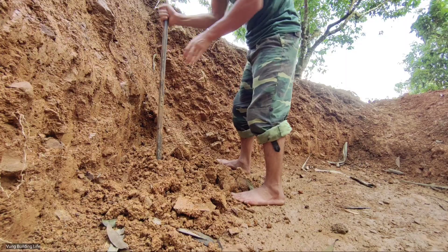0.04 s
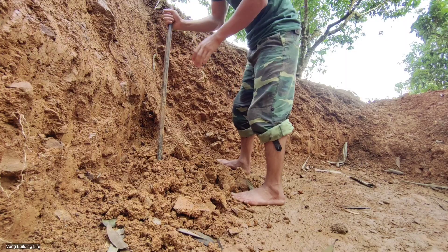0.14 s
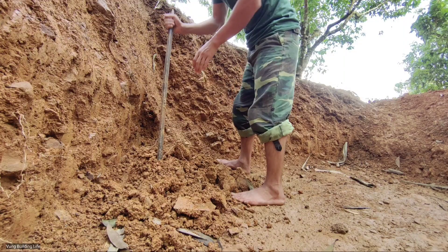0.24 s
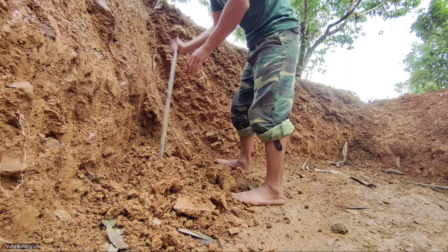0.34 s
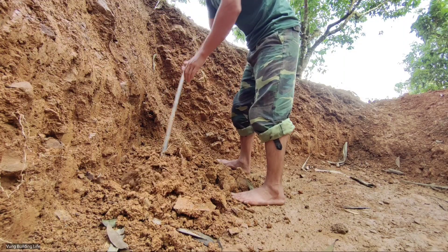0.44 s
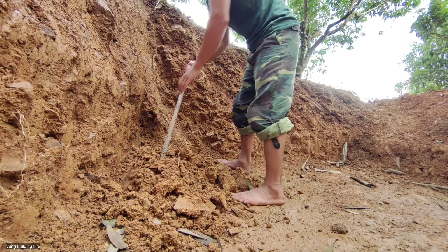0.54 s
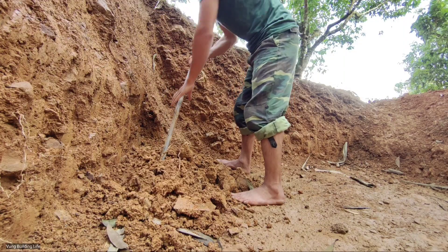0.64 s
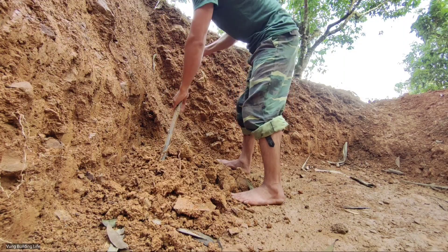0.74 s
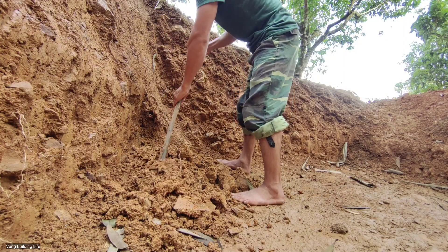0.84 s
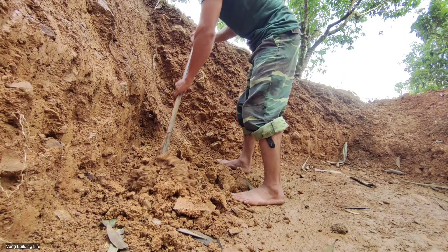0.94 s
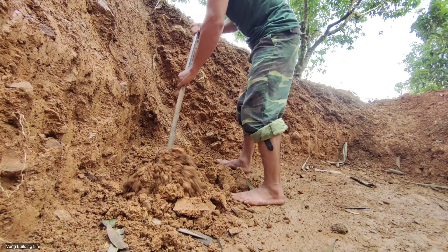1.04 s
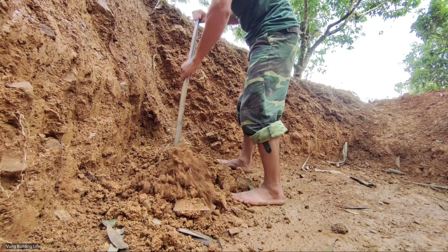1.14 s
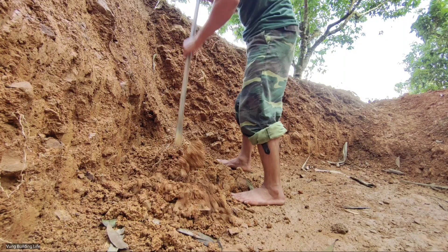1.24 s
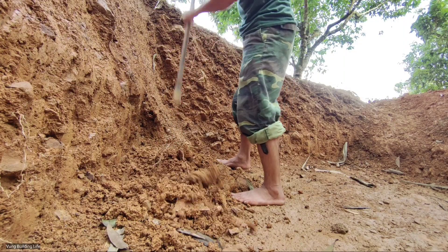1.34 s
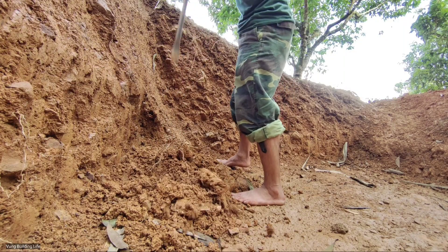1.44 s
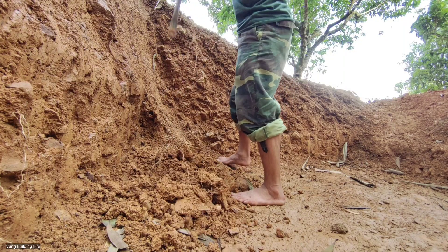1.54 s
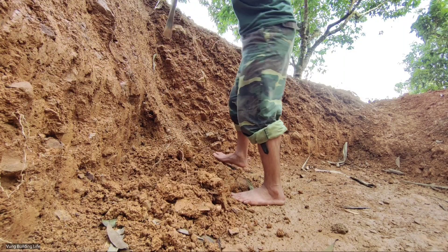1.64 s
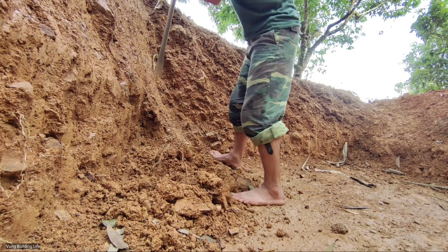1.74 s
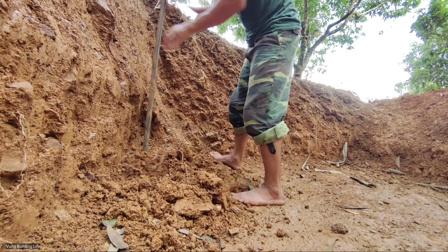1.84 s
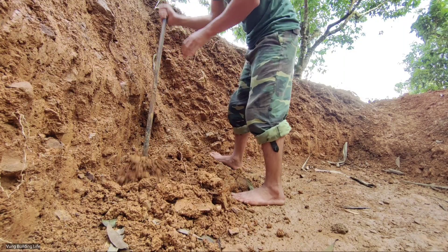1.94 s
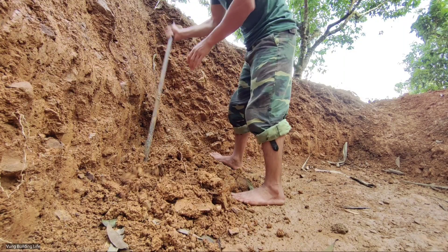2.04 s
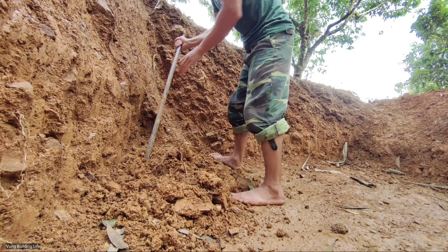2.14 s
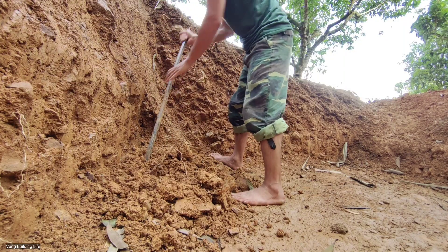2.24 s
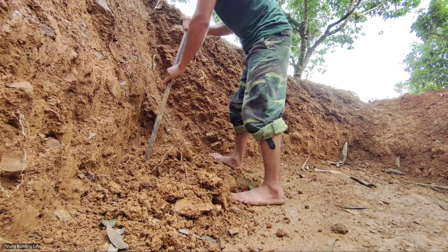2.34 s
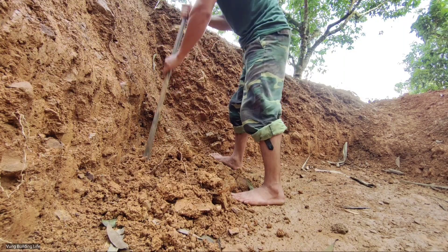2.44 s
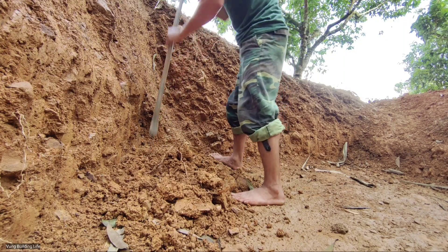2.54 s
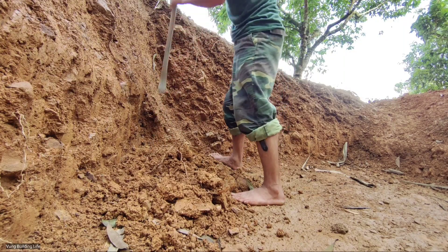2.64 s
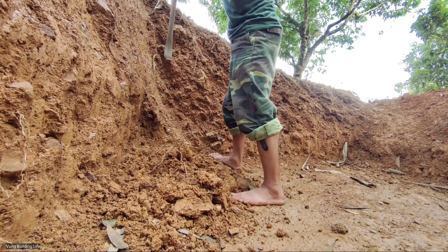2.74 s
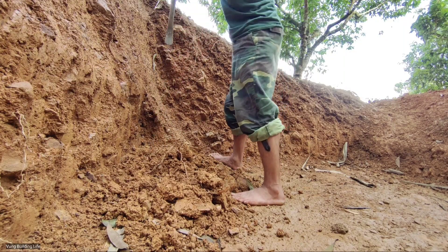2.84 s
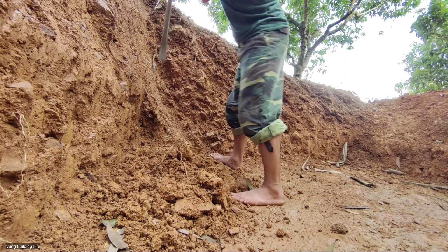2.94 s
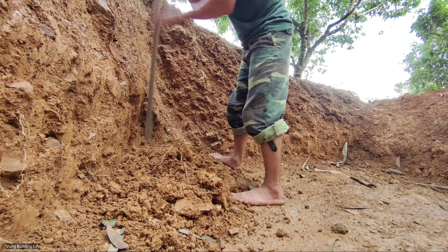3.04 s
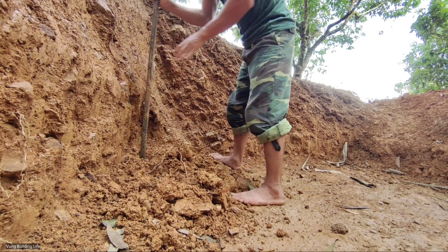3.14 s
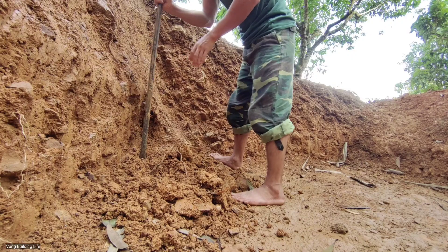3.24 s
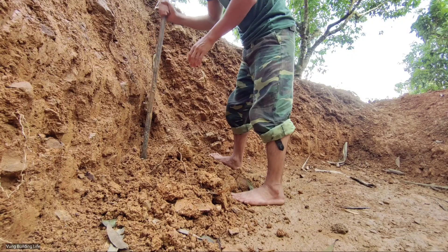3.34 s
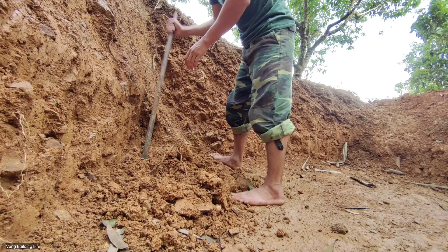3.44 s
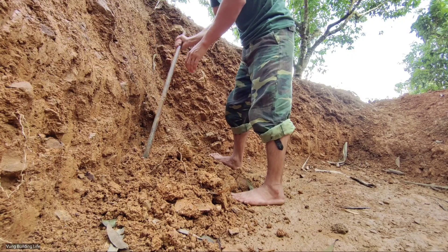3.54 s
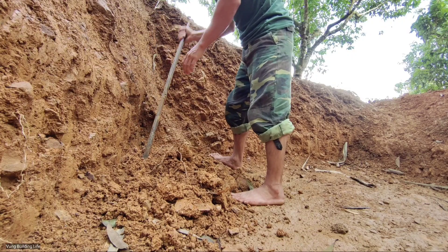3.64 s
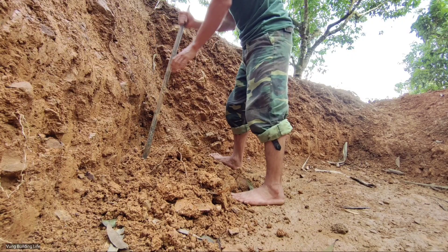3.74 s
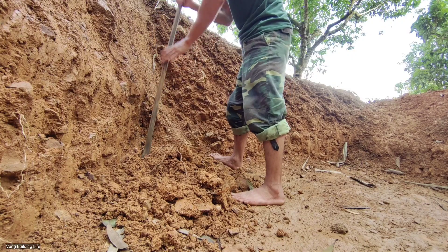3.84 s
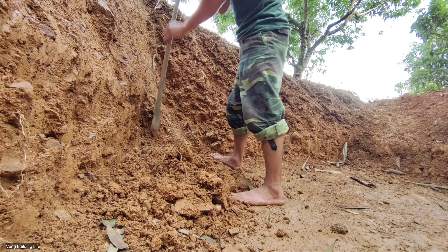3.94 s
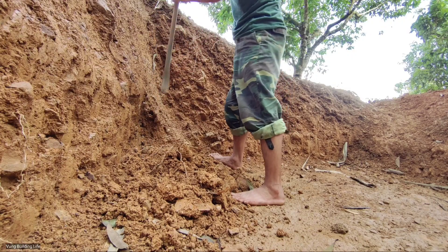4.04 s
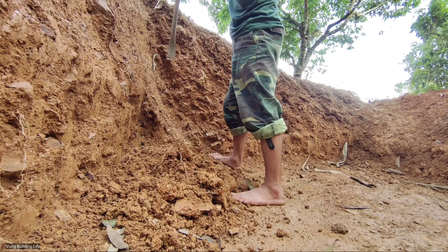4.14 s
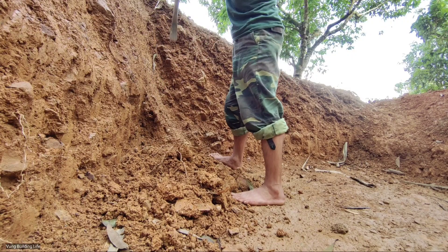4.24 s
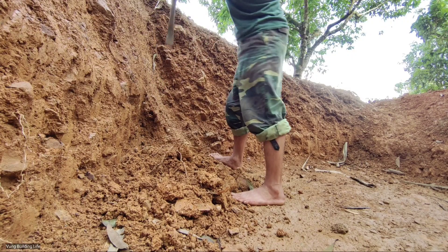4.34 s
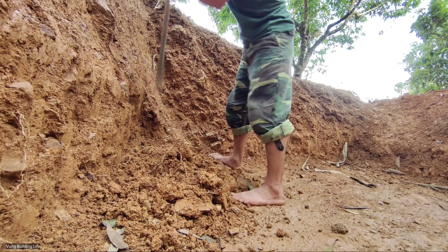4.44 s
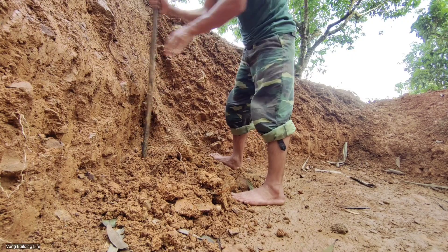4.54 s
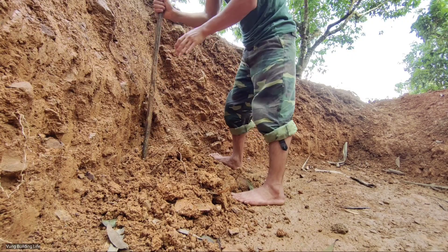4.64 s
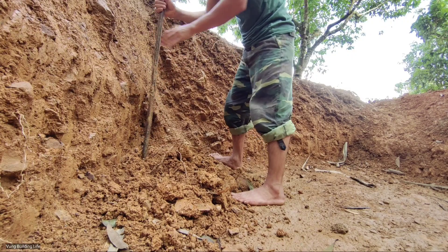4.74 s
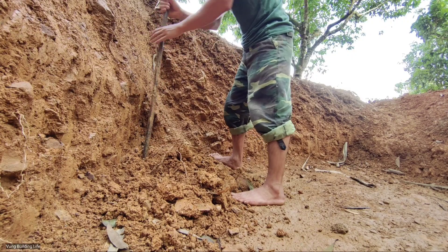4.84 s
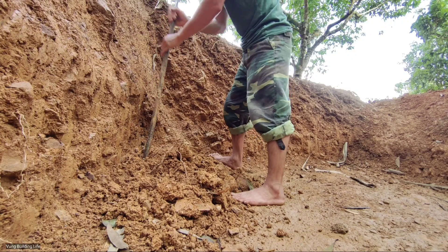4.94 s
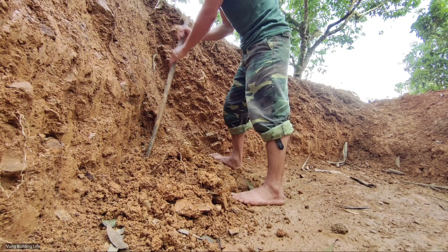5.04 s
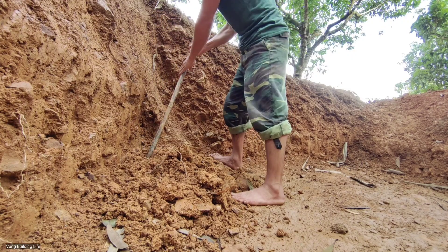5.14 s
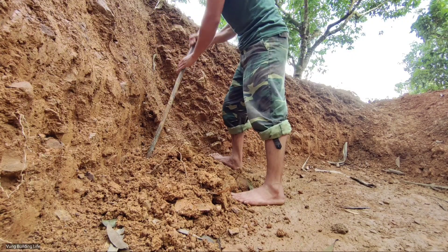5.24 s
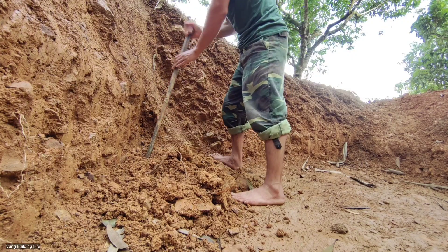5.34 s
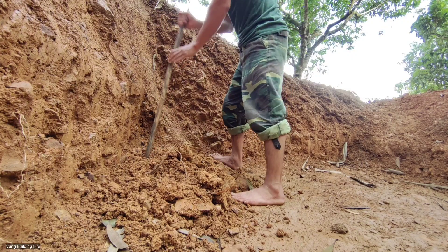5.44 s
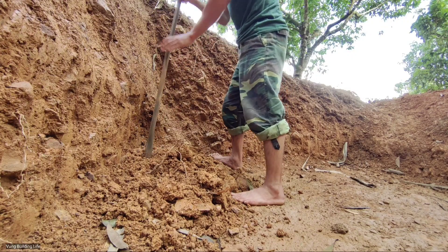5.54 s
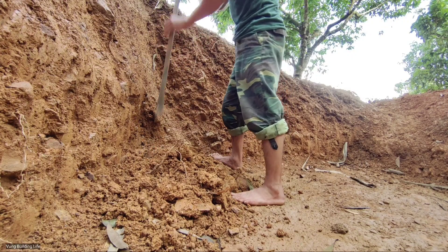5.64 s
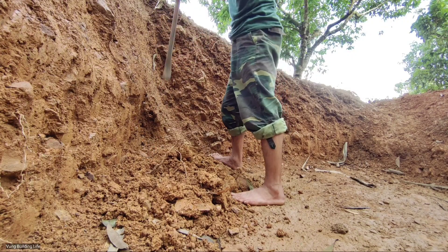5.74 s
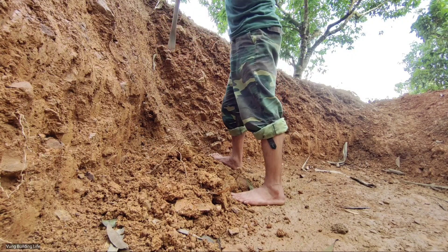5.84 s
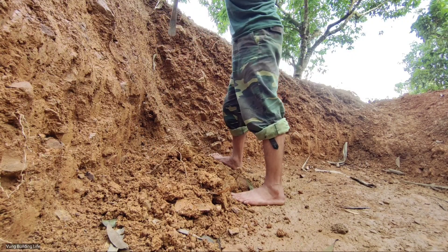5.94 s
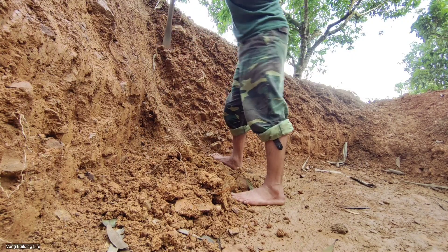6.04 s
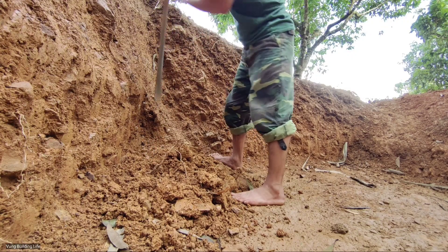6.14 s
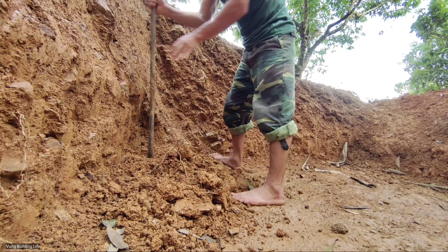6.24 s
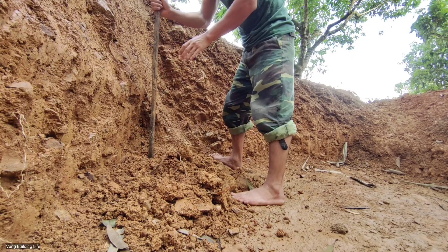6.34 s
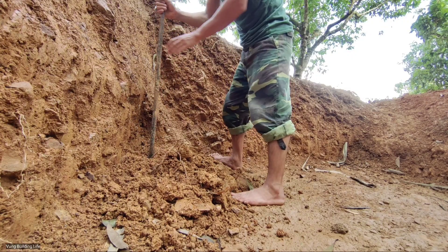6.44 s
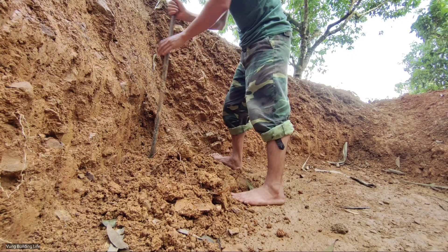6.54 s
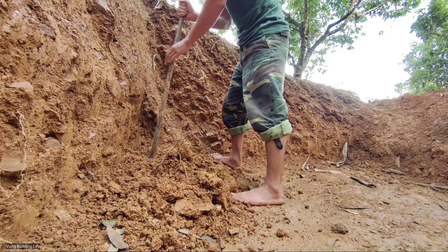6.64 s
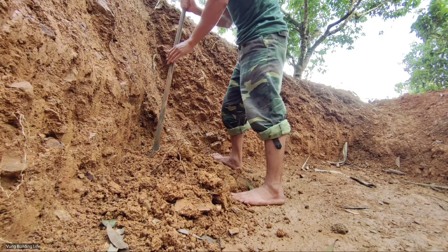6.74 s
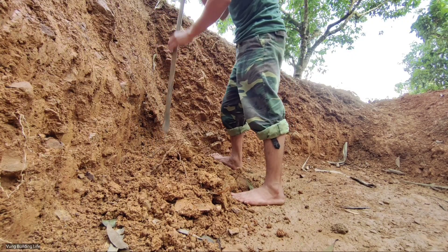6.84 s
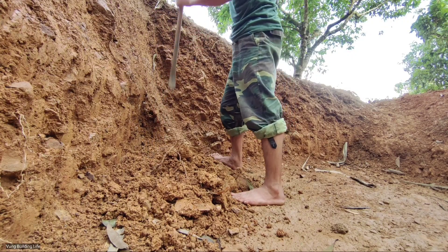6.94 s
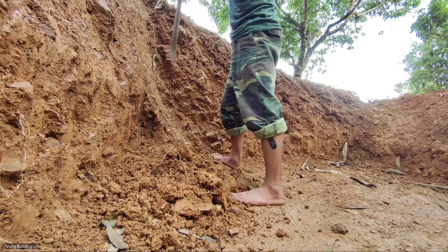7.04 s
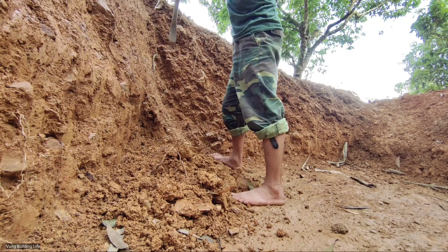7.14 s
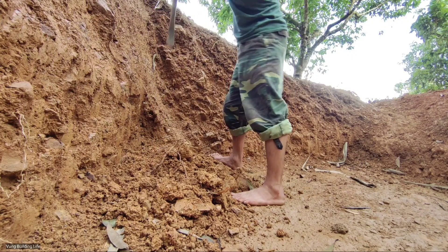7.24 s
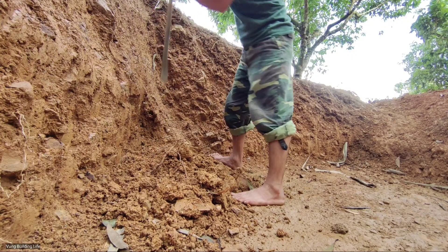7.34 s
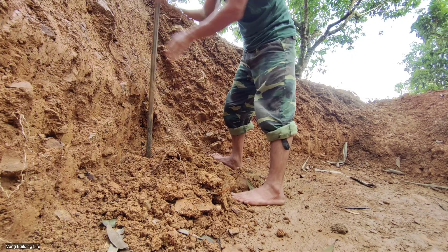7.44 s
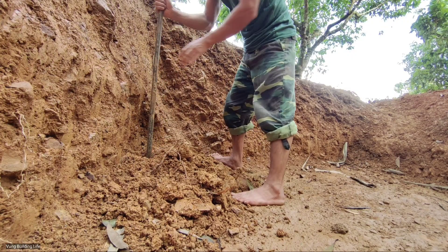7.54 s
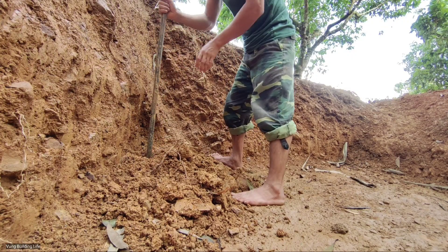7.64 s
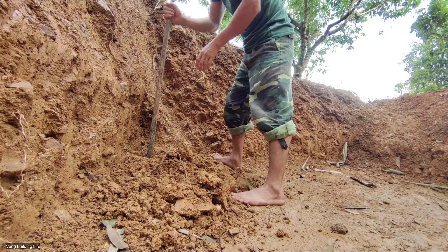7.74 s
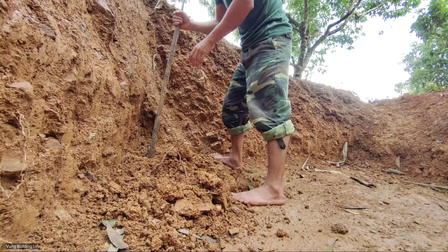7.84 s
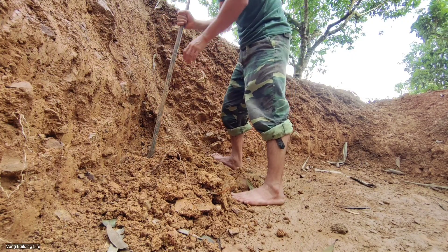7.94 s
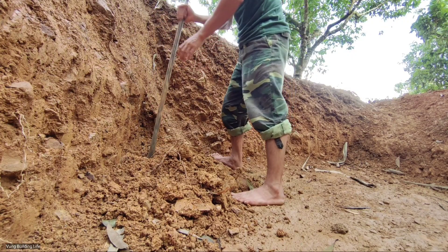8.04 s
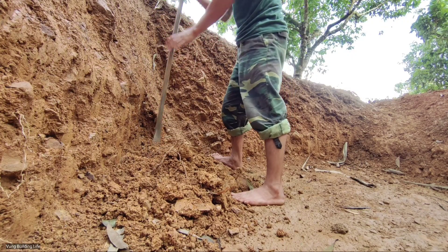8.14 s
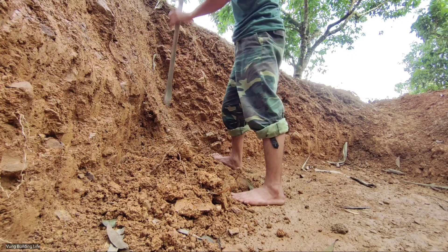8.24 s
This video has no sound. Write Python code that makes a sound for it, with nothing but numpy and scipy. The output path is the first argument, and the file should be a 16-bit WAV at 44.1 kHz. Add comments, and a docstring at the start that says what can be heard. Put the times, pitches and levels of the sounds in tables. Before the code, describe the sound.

A heavy iron bar strikes hard clay again and again with sharp cracks and dull thuds, crumbling dirt between blows, faint cicadas far off.

```python
"""An iron digging bar is driven into hard clay in a pit, levered and drawn out: noise cracks plus sine thuds.
The bar rings as it rubs (noise through bending modes); clods snap and knock, grit, sand and lumps trickle.
Cicadas hiss far off over murmuring air (shaped stereo noise).
Two spaced microphones of unlike treble listen; the clay walls add a short reverb."""
import sys
import numpy as np
from scipy import signal
from scipy.fft import rfft, irfft, next_fast_len
from scipy.io import wavfile
from scipy.ndimage import uniform_filter1d, map_coordinates

SR = 44100
rng = np.random.default_rng(int(sys.argv[2]) if len(sys.argv) > 2 else 0)


def store_wav(level_fs):
    """Save 16-bit WAV to argv[1]."""
    pcm = np.round(np.clip(np.atleast_2d(level_fs), -1, 1) * 32767)
    wavfile.write(sys.argv[1], SR, pcm.T.astype(np.int16))


N = 364707


def amp(db):
    """Decibels to gain."""
    return 10 ** (np.asarray(db) / 20)


def unit(x):
    """Scaled to rms 1."""
    return x / np.sqrt(np.mean(x ** 2) + 1e-20)


def peak(x):
    """Scaled to peak 1."""
    return x / np.abs(x).max()


def along(points, hz):
    """Interpolates (f/Hz, value) points on a log frequency axis."""
    f, v = np.transpose(points)
    return np.interp(np.log(hz + 1), np.log(f + 1), v)


def curve(rows):
    """Interpolates (t/s, value) rows to one value per sample."""
    s, value = np.transpose(rows)
    return np.interp(np.arange(N) / SR, s, value)


def wobble(knots_per_s):
    """Smooth random curve."""
    knots = rng.standard_normal(int(N * knots_per_s / SR) + 4)
    return map_coordinates(knots, [np.arange(N) * knots_per_s / SR])


def filtered(x, response):
    """Applies a complex frequency response to x."""
    n = x.shape[-1]
    m = next_fast_len(n + SR // 4)
    return irfft(rfft(x, m) * response(np.fft.rfftfreq(m, 1 / SR)), m)[..., :n]


def band(hz, lo_hz, hi_hz):
    """Causal band-pass, 12 dB an octave each side."""
    high_pass = 1j * hz / lo_hz / (1 + 1j * hz / lo_hz)
    return (high_pass / (1 + 1j * hz / hi_hz)) ** 2


def resonance(hz, centre_hz, width_hz):
    """Band-pass response of one damped mode, gain 1 at its centre."""
    damping = 1j * hz * width_hz
    return damping / (centre_hz ** 2 - hz ** 2 + damping)


def add(track, s, sound):
    """Mixes a sound into the track at s seconds."""
    part = track[..., round(s * SR):][..., :sound.shape[-1]]
    part += sound[..., :part.shape[-1]]


def burst(t, t60_s):
    """Noise with a 0.4 ms attack, 60 dB down after t60_s (4 ms at least)."""
    decay = amp(-60 * (t / max(t60_s, .004)) ** 1.4)
    return rng.standard_normal(len(t)) * decay * (1 - np.exp(-t / .0004)) / 2


def grains(clicks_per_s, spread_db, clump_db):
    """Clumped random clicks of scattered size on a bed of noise."""
    size = amp(spread_db * np.clip(rng.standard_normal(N), -2, 2))
    clicks = (rng.random(N) < clicks_per_s / SR) * size * rng.choice([-1, 1], N)
    return (unit(clicks) + 0.6 * rng.standard_normal(N)) * amp(clump_db * wobble(130))


# left-right likeness of far sound: f/Hz, likeness 0-1
LIKENESS = [(60, 1), (240, 0.71), (950, 0.029)]


def rush(spectrum, patchy_db):
    """Far stereo noise of rms 1, its gain in random time-frequency patches."""
    z = signal.stft(rng.standard_normal((2, N)), nperseg=512)[2]
    field = uniform_filter1d(rng.standard_normal(z.shape[1:]), 5, 0)
    field = uniform_filter1d(field, 10, 1)
    pair = signal.istft(z * amp(patchy_db * unit(field)), nperseg=512)[1][:, :N]

    def mid_side(hz):
        angle = np.arccos(np.clip(along(LIKENESS, hz), -1, 1)) / 2
        return amp(along(spectrum, hz)) * [np.cos(angle), np.sin(angle)]

    mid, side = filtered(pair, mid_side)
    return unit(np.array([mid + side, mid - side]))


# cicada spectrum shape: f/Hz, density/dB per Hz
CICADA_SHAPE = [(3950, -31.5), (4490, -8), (5290, -7), (6060, -19.5), (7500, -38), (16500, -120)]
# cicada loudness: t/s, level/dB
CHORUS_LEVEL = [(0.0, -62), (0.53, -68), (1.15, -63.5), (8.27, -64)]
# open-air spectrum shape: f/Hz, density/dB per Hz
AIR_SHAPE = [(20, -0.5), (60, 4), (200, -11.5), (270, -3), (370, -18.5), (2300, -25.5), (4000, -18),
             (8200, -31), (12000, -32.5), (15400, -24.5), (15900, -58.5)]
AIR_DB = -61.5


def outdoors():
    """Cicada chorus, a band of unevenly buzzing noise, over drifting low air murmur."""
    buzz = amp(curve(CHORUS_LEVEL) + 0.45 * np.array([wobble(120), wobble(150)]))
    chorus = buzz * rush(CICADA_SHAPE, patchy_db=3)
    drift = amp(.8 * wobble(2))
    return chorus + amp(AIR_DB) * drift * rush(AIR_SHAPE, patchy_db=3.5)


# clay shifting under the bar: full strength t/s, swell/s, hold/s, grit level/dB, lumps level/dB, sand level/dB
CLAY_SHIFTS = [(0.0, .01, 0.0071, -43, -50.5, -42.5), (0.366, 0.18, 0.053, -63.5, -70, -63.5),
               (0.955, 0.14, 0.12, -55.5, -56, -54.5), (1.24, 0.18, 0.27, -48.5, -63, -48),
               (1.606, 0.058, 0.024, -57, -76, -53.5), (2.381, 0.038, 0.041, -55.5, -57.5, -52.5),
               (3.465, 0.095, 0.034, -59, -55.5, -54.5), (3.726, 0.13, 0.3, -70.5, -83, -63),
               (4.892, 0.26, 0.066, -68.5, -73, -56.5), (5.046, 0.24, 0.047, -57, -52.5, -56),
               (5.316, 0.27, 0.024, -58, -63.5, -58), (5.482, 0.045, 0.052, -57.5, -59.5, -56),
               (6.315, 0.0092, 0.037, -49.5, -76, -44.5), (6.534, 0.42, 0.0091, -56.5, -63, -48),
               (6.569, 0.11, 0.05, -56, -54.5, -65), (7.886, 0.1, 0.033, -58, -61, -49),
               (8.005, 0.06, 0.0099, -49, -53, -56)]
# fall after the hold: grit, lumps, sand, rumble [dB/s]
SETTLE_FALL = [194, 185, 157.3, 114]
# steady floor: grit, lumps, sand, rumble level/dB
TRICKLE_LEVEL = [-89.5, -79.5, -74, -90.5]
SWELL_DB, RUMBLE_RE_LUMPS_DB = 20, -10.5  # climb during a swell; rumble of a shift
HARD_DB = -16  # cracks above this throw debris
# delay (also the swell); grit, lumps, sand, rumble: level, then fall
DEBRIS_S, DEBRIS_DB, DEBRIS_DB_PER_S = 0.026, [-42, -51, -48, -52], [101, 145, 76, 73]


def flow():
    """Gains of grit, lumps, sand, rumble: powers of trickle, debris of hard blows and shifts add."""
    t = np.arange(0, N / SR + .01, .002)
    events = [(s + DEBRIS_S, DEBRIS_S, 0, DEBRIS_DB, DEBRIS_DB_PER_S)
              for s, crack_db, *_ in BLOW_EVENTS if crack_db > HARD_DB]
    for s, swell_s, hold_s, grit_db, lumps_db, sand_db in CLAY_SHIFTS:
        levels_db = [grit_db, lumps_db, sand_db, lumps_db + RUMBLE_RE_LUMPS_DB]
        events.append((s, swell_s, hold_s, levels_db, SETTLE_FALL))
    power = amp(TRICKLE_LEVEL)[:, None] ** 2 + 0 * t
    for s, swell_s, hold_s, levels_db, fall in events:
        before_s, after_s = np.maximum(s - t, 0), np.maximum(t - s - hold_s, 0)
        db = np.c_[list(levels_db)] - SWELL_DB * before_s / swell_s - np.c_[list(fall)] * after_s
        power = power + amp(db) ** 2
    return [np.interp(np.arange(N) / SR, t, np.sqrt(p)) for p in power]


# fine sand spectrum shape: f/Hz, density/dB per Hz
SAND_SHAPE = [(2650, -10.5), (4500, -6.5), (6400, 11.5), (9920, -14), (11300, -39.5), (12500, -14),
              (15300, -9.5), (15900, -49)]
# hum of the hole as lumps grind in it: t/s, f/Hz
HOLE_HUM = [(1.03, 498), (3.4, 692.5), (5.06, 748), (5.09, 514.7), (6.4, 676.4)]
HOLE_HALF_WIDTH_HZ, HOLE_RE_GRIND_DB = 70, 1


def soil():
    """Grit and sand filter one grain shower; lumps grind, hum in the hole and shake the floor."""
    grit_gain, grind_gain, sand_gain, rumble_gain = flow()
    shower = grains(1600, spread_db=6, clump_db=2)
    grit = unit(filtered(shower, lambda hz: band(hz, 1100, 4300) ** 2))
    sand = unit(filtered(shower, lambda hz: amp(along(SAND_SHAPE, hz))))

    lumps = grains(500, spread_db=2, clump_db=1.5)
    slow_lumps = filtered(lumps, lambda hz: 1 / (1 + 1j * hz / HOLE_HALF_WIDTH_HZ) ** 2)
    hum = slow_lumps * np.sin(2 * np.pi * np.cumsum(curve(HOLE_HUM)) / SR)
    dull = unit(filtered(lumps, lambda hz: band(hz, 290, 570) ** 2))
    grind = unit(dull + amp(HOLE_RE_GRIND_DB) * unit(hum))
    rumble = unit(filtered(lumps, lambda hz: band(hz, 170, 220) ** 3))
    return rumble_gain * rumble + grit_gain * grit + grind_gain * grind + sand_gain * sand


# bar rubbing: t/s, length/s, level/dB, brightest f/Hz, floor of far modes/dB, sideways share 0-1
RUB_EVENTS = [(0, 0.017, -43.5, 5170, -22, 0.58), (2.372, 0.03, -51, 4320, -13.5, 0.05),
              (2.42, 0.016, -52.5, 3570, -7, 0.56), (3.756, 0.0324, -59, 3580, -10, 0.64),
              (4.547, 0.13, -51.5, 3310, -20, 0.8), (4.952, 0.16, -63, 4330, -6, 1),
              (5.269, 0.057, -59.5, 5800, -9.5, 1), (5.457, 0.015, -50, 5800, 0, 0.84),
              (6.3, 0.15, -52, 5600, -20, 0.1), (6.461, 0.16, -53, 6800, -30, 1),
              (6.604, 0.011, -58.5, 3220, -10, 0.05), (8.012, 0.023, -46, 3050, -4.5, 0.04)]
# bending modes, flat way: f/Hz
FLAT_MODES = [915, 1297, 1744, 2261, 2855, 3500, 4200, 4972, 5775, 6645, 7560, 8545]
# strengths, flat way: level/dB
FLAT_LEVEL = [-3.5, -8, -9.5, 1.5, 4.5, 2, 0.5, -2, -0.5, 5, -11.5, -20]
# bending modes, sideways: f/Hz
EDGE_MODES = [969, 1416, 1943, 2538, 3208, 3955, 4765, 5645, 6600]
# strengths, sideways: level/dB
EDGE_LEVEL = [6.5, 1.8, -0.5, 6, 2.5, 5, -4, -8.5, 5.5]
GRIP_DB = 58.5  # mode loss one octave from the brightest, before the floor
LET_GO_S = 0.012  # shortest fade time constant


def bar():
    """Rough rubbing noise feeds the bending modes, most near where the grip lets the bar move."""
    out, t = np.zeros(N), np.arange(SR // 2) / SR
    mode_hz = np.array(list(FLAT_MODES) + list(EDGE_MODES), float)[:, None]
    for s, length_s, db, bright_hz, far_db, share in RUB_EVENTS:
        # roughness: random gain steps of 130 samples
        catch = amp(2.5 * np.repeat(rng.standard_normal(len(t) // 130 + 1), 130)[:len(t)])
        fade = np.exp(-np.maximum(t - length_s, 0) / (LET_GO_S + length_s / 5))
        rub = rng.standard_normal(len(t)) * catch * fade
        # long rubs: tip still damped by clay
        width_hz = (4 + .0028 * mode_hz) * (1 + (length_s / .075) ** 2)
        rings = filtered(rub, lambda hz: resonance(hz, mode_hz, width_hz))
        rings /= np.linalg.norm(rings, axis=1, keepdims=True)
        grip_db = np.maximum(-GRIP_DB * np.log2(mode_hz[:, 0] / bright_hz) ** 2, far_db)
        grip_db = grip_db + rng.normal(0, 1.5, len(mode_hz))
        strength = np.r_[(1 - share) * amp(FLAT_LEVEL), share * amp(EDGE_LEVEL)]
        ring = (strength * amp(grip_db)) @ rings
        rms = np.sqrt(np.mean(ring[t < length_s + .03] ** 2))
        add(out, s, amp(db) * ring / rms)
    return out


# tip jolts into clay: t/s, crack peak level/dB, thud peak re crack/dB, treble lift of crack/dB,
# crack t60/s, thud centre f/Hz
BLOW_EVENTS = [(0.0014, -19, -5, 4, 0.054, 500), (0.0312, -39.5, 14.5, -10, 0.0081, 190),
               (1.8265, -24.5, -22, 5.5, 0.084, 500), (1.8368, -28, -2, -2, 0.25, 300.3),
               (1.8429, -4, -12, -8, 0.0074, 334.3), (2.4, -64.5, 19, 2, 0.021, 266),
               (3.0691, -27.5, -14, 1, 0.25, 444), (3.0791, -4.5, -11.5, -2.5, 0.014, 480),
               (3.0844, -20.5, -27.5, 5, 0.0078, 600), (4.5238, -23, -6.5, -7, 0.0079, 604),
               (4.5285, -5, -7.5, -7, 0.014, 710), (5.436, -40, 0, -9, 0.22, 450),
               (5.455, -40, 8, -14, 0.035, 477), (6.1937, -24.5, -17, 3.5, 0.12, 446),
               (6.2049, -2.5, -12.5, -1, 0.0083, 320), (6.2311, -26.5, 0, -6, 0.11, 302),
               (6.2448, -30, 6, -9, 0.041, 291), (7.457, -32, -11, -3, 0.048, 453),
               (7.4669, -9, -3, -5.5, 0.015, 646)]
# crack spectrum shape: f/Hz, density/dB per Hz
CRACK_SHAPE = [(530, 3), (900, -3), (1300, -10), (2000, -0.5), (2710, 0), (3850, -5.5), (4790, -13),
               (6730, 1), (8260, -15), (12000, -29.5), (15300, -23.5), (16300, -66.5)]
# pit floor modes: f/Hz, level/dB, t60/s
FLOOR_MODES = [(138, -4, 0.052), (234, -0.5, 0.1), (291, -2.5, 0.066), (523, -0.5, 0.038), (724, 4, 0.024),
               (946, -10, 0.072)]
BURIED_WIDTH_HZ, STRUCK_SCATTER_DB = 130, 6  # bar modes, tip buried
THUD_FOCUS_DB = 3  # floor mode loss one octave from the thud centre


def blows():
    """Each jolt cracks the clay through the damped bar and thumps the floor modes, varying by spot."""
    out, t = np.zeros(N), np.arange(SR // 4) / SR
    bar_hz = list(FLAT_MODES) + list(EDGE_MODES)
    for s, crack_db, thud_db, lift_db, t60_s, centre_hz in BLOW_EVENTS:
        mode_gain = amp(STRUCK_SCATTER_DB * rng.standard_normal(len(bar_hz)))

        def through_bar(hz):
            lift = lift_db * np.clip((hz - 4800) / 900, 0, 1)
            iron = .5 + sum(g * resonance(hz, f, BURIED_WIDTH_HZ) for f, g in zip(bar_hz, mode_gain))
            high_pass = (1j * hz / (300 + 1j * hz)) ** 2
            return amp(along(CRACK_SHAPE, hz) + lift) * iron * high_pass

        crack = filtered(burst(t, t60_s), through_bar)
        thud = np.zeros(len(t))
        for hz, db, decay_s in FLOOR_MODES:
            spot_db, detune = rng.normal(0, 2), rng.normal(0, .025)
            focus_db = THUD_FOCUS_DB * np.log2(hz / centre_hz) ** 2
            level = amp(db + spot_db - focus_db - 60 * (t / decay_s) ** 0.67)
            thud -= level * np.sin(2 * np.pi * hz * (1 + detune) * t)  # first push is downward
        thud = filtered(thud * (1 - np.exp(-t / .0012)), lambda hz: 1j * hz / (120 + 1j * hz))
        add(out, s, amp(crack_db) * peak(crack) + amp(crack_db + thud_db) * peak(thud))
    return out


# pit reverb: f/Hz, t60/s
PIT_DECAY = [(200, .09), (9000, .035)]


def pit(x):
    """Clay walls answer with a decaying noise tail, unlike per microphone, redrawn each second."""
    out = np.zeros((2, N))
    for s in range(N // SR + 1):
        hz, t, z = signal.stft(rng.standard_normal((2, SR // 8)), SR, nperseg=256)
        decay = amp(-60 * t / along(PIT_DECAY, hz)[:, None])
        tail = signal.istft(z * decay, SR, nperseg=256)[1]
        tail = tail / np.linalg.norm(tail[0])
        delayed = np.pad(x[s * SR:][:SR], (130, 0))  # 130 samples, about 3 ms
        add(out, s, signal.fftconvolve(delayed[None], tail, axes=1))
    return out


# clods landing and cracking: t/s, snap peak level/dB, knock peak re snap/dB, snap t60/s, snap f/Hz
CLOD_EVENTS = [(0.835, -29, -13, 0.013, 5700), (0.9004, -30.5, -1, 0.025, 4050),
               (1.012, -36, 3, 0.018, 3600), (1.065, -36, -14, 0.0098, 6400),
               (1.1845, -38, 0.5, 0.039, 6560), (1.2346, -35.5, -4.5, 0.063, 5540),
               (1.259, -33.5, -5.5, 0.12, 6100), (1.291, -36.5, -6.5, 0.046, 6000),
               (1.378, -40, 1, 0.012, 6350), (1.396, -35, -1, 0.032, 5930),
               (1.4493, -39.5, -9, 0.026, 6130), (1.524, -32.5, -16.5, 0.038, 6330),
               (1.547, -35.5, -10, .014, 6540), (2.036, -35.5, -44, 0.091, 6470),
               (2.373, -36.5, -14, 0.0124, 4840), (2.9864, -40.5, -30, 0.014, 6440),
               (3.471, -40.5, -20, 0.022, 6260), (4.8438, -38.5, -32, 0.15, 3380),
               (7.7605, -37, -26, 0.026, 6430), (7.857, -28.5, -17.5, 0.022, 6450),
               (7.8965, -34, -28, 0.054, 6450)]
SNAP_WIDTH_HZ = 740


def clods():
    """A clod snaps with a band of noise around its listed frequency and knocks dully below."""
    out, t = np.zeros(N), np.arange(SR // 8) / SR
    for s, snap_db, knock_db, t60_s, snap_hz in CLOD_EVENTS:
        breaking = burst(t, t60_s) + 2.5 * burst(t, .006)
        snap = filtered(breaking, lambda hz: band(hz, 1200, 3600)
                        * (0.12 + resonance(hz, snap_hz, SNAP_WIDTH_HZ)))
        knock = filtered(burst(t, 1.38 * t60_s), lambda hz: band(hz, 314, 1600))
        add(out, s, amp(snap_db) * peak(snap) + amp(snap_db + knock_db) * peak(knock))
    return out


LEFT_LAG_SAMPLES = 8  # left microphone is farther from the floor


def scene():
    """Blows carry most to the left microphone, farther from the floor; the upright bar faces both."""
    hits, loose, ring = blows(), clods() + soil(), bar()
    near = hits * amp([[3.5], [-3.5]]) + loose * amp([[.4], [-.4]])

    def around_housing(hz):
        lag = 2 * np.pi * hz * LEFT_LAG_SAMPLES / SR
        return np.exp(-1j * (lag + .6 * np.arctan(hz / 700)))  # low tones bend round the housing

    near[0] = filtered(near[0], around_housing)
    near += ring * amp([[1.5], [-1.5]])
    return amp(-1.0) * near + amp(-12.5) * pit(hits + loose + ring) + outdoors()


# microphone mismatch: f/Hz, left minus right/dB
MIC_DIFFERENCE = [(150, -2.2), (380, 0.6), (2380, -3), (5980, -11.5), (15000, -0.5)]
TOP_HZ = 16300


def record(dry):
    """Right microphone hears more treble; deep bass is cut and nothing passes above TOP_HZ."""
    def microphones(hz):
        bass_cut = (1j * hz / (70 + 1j * hz)) ** 2
        return bass_cut * amp(along(MIC_DIFFERENCE, hz) * [[.5], [-.5]]) * (hz < TOP_HZ)

    return filtered(dry, microphones)


dry = scene()
out = record(dry)
store_wav(out)
```